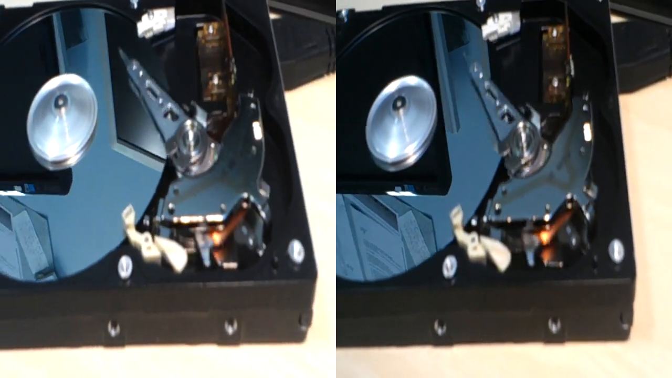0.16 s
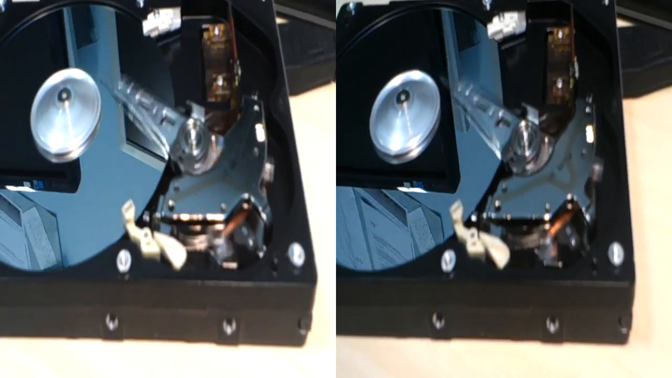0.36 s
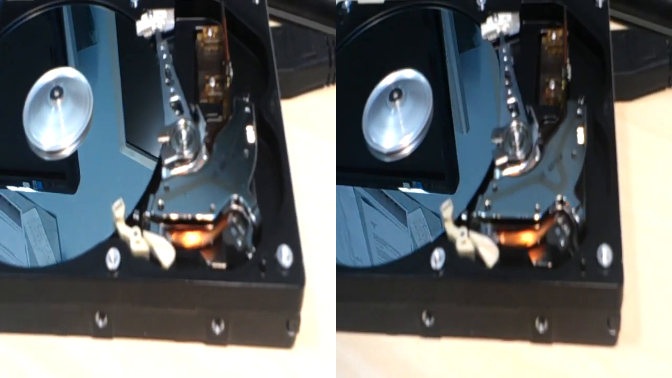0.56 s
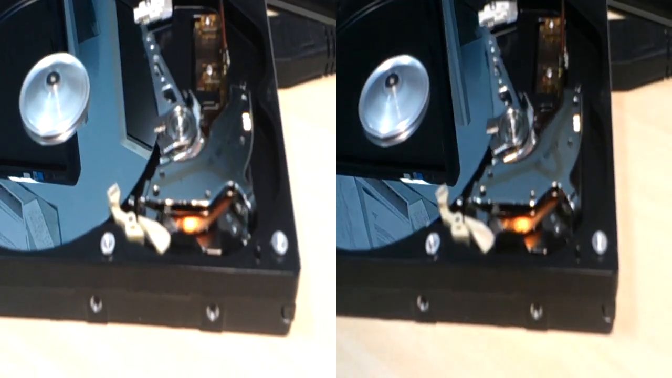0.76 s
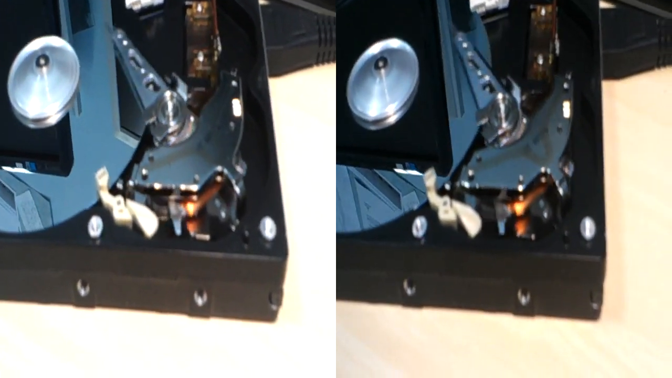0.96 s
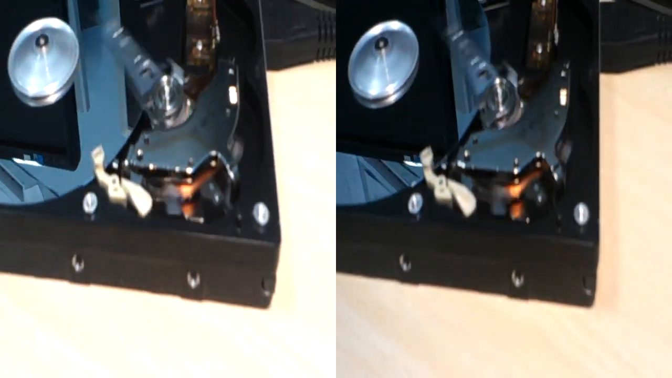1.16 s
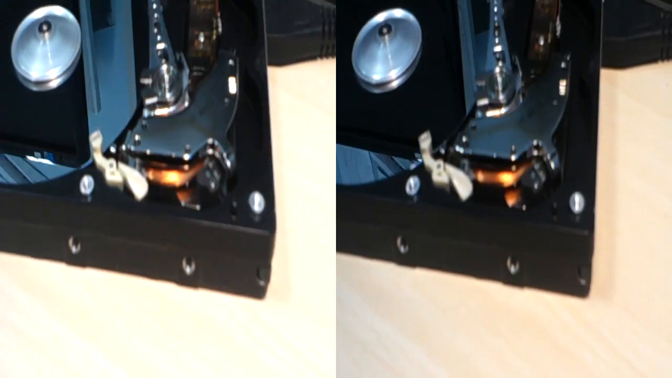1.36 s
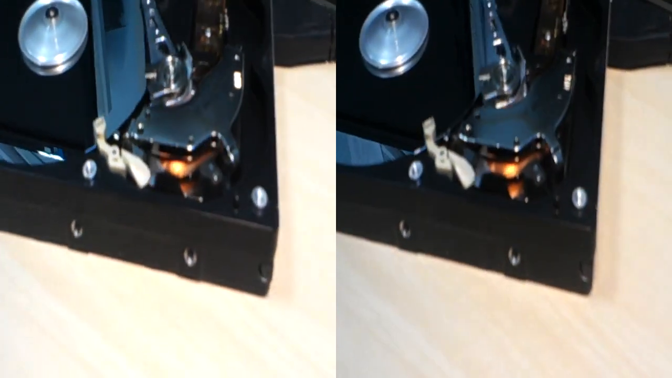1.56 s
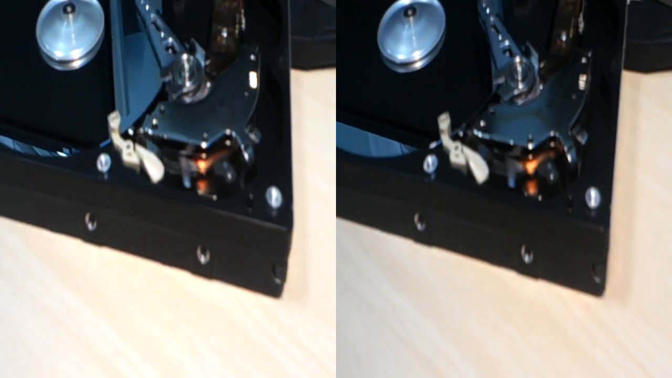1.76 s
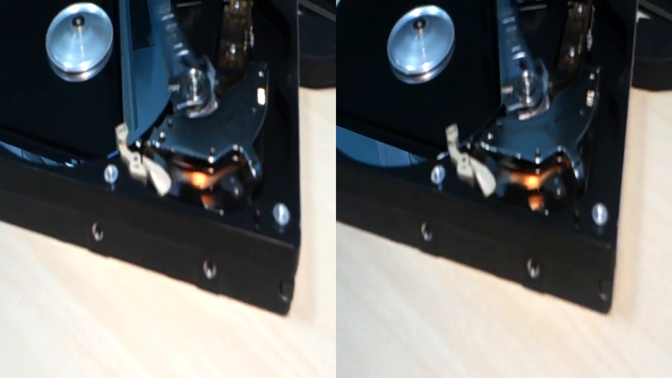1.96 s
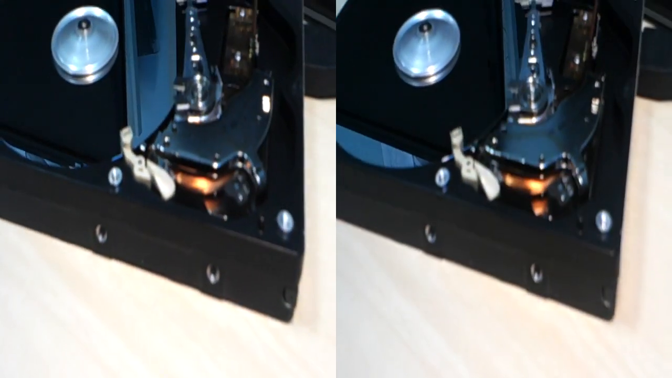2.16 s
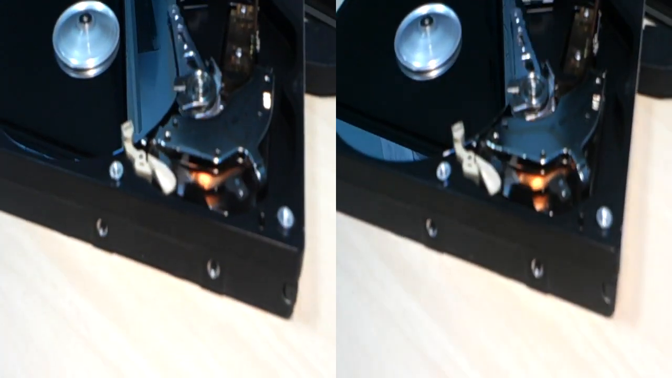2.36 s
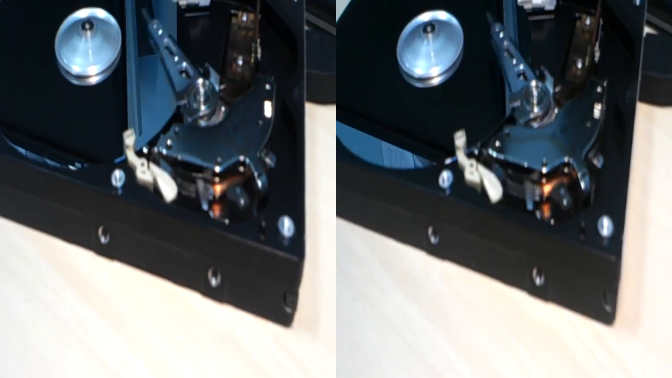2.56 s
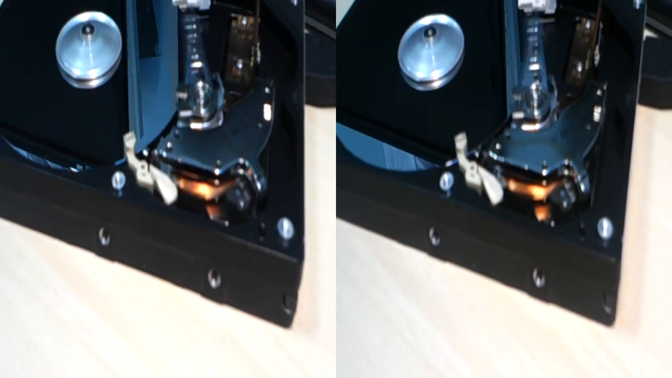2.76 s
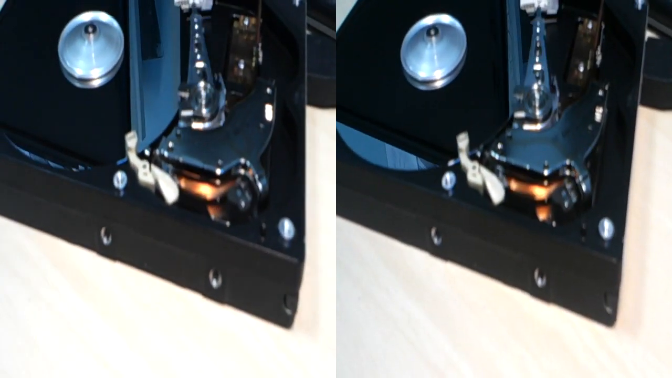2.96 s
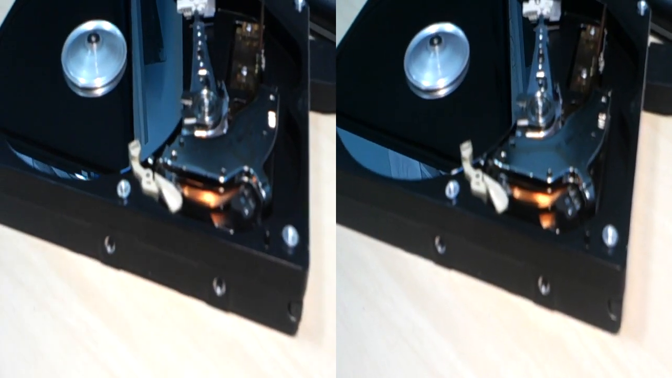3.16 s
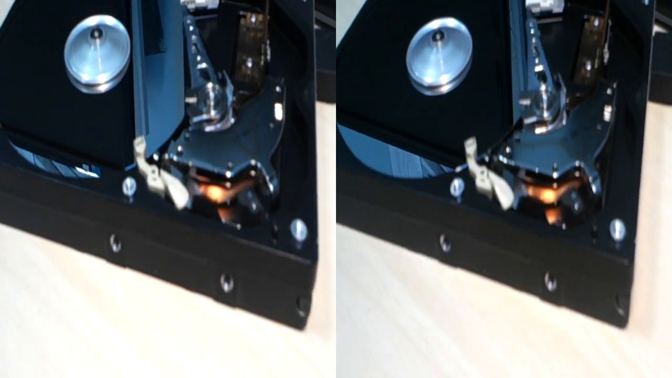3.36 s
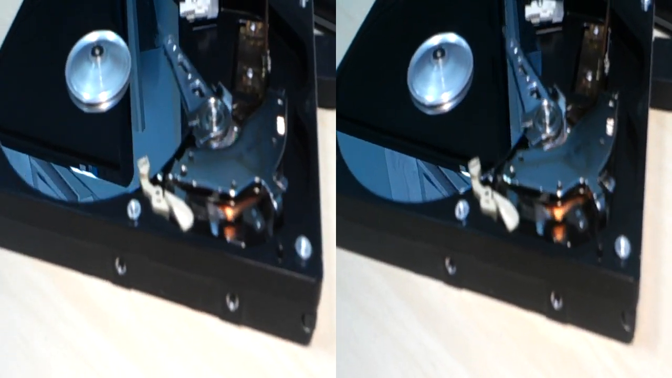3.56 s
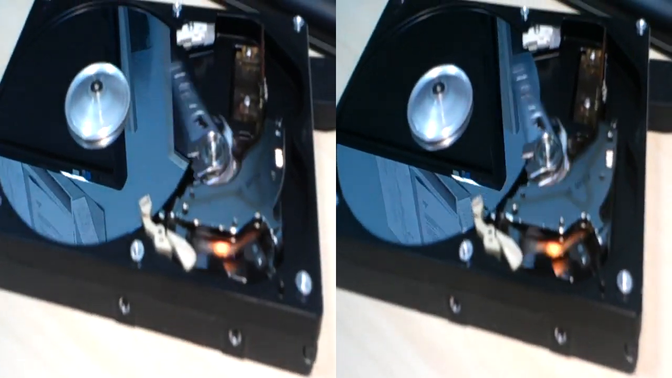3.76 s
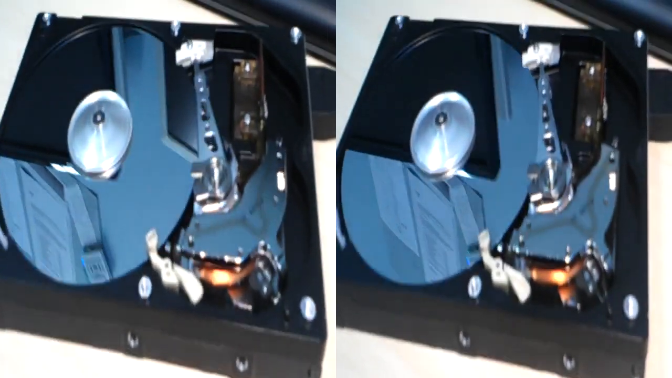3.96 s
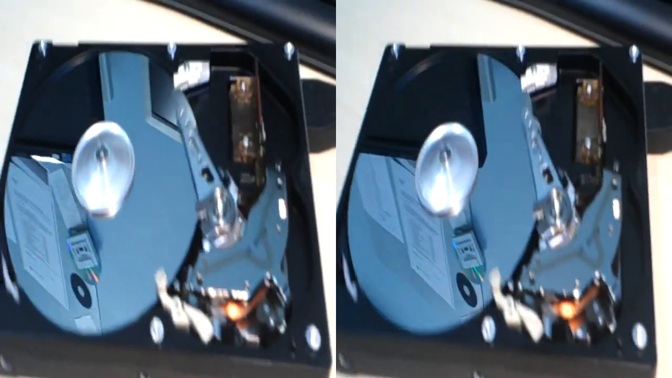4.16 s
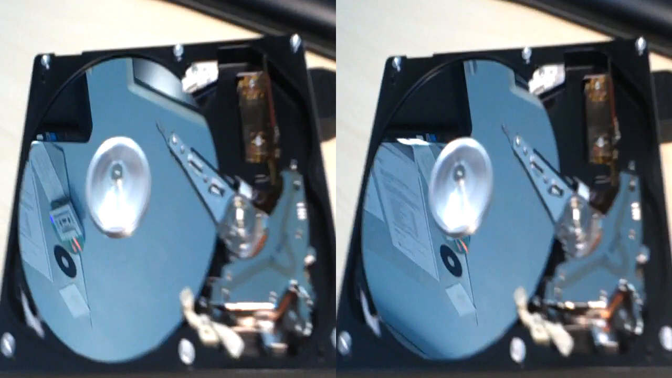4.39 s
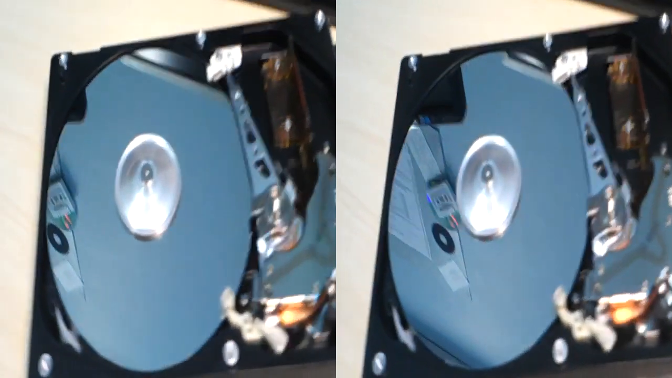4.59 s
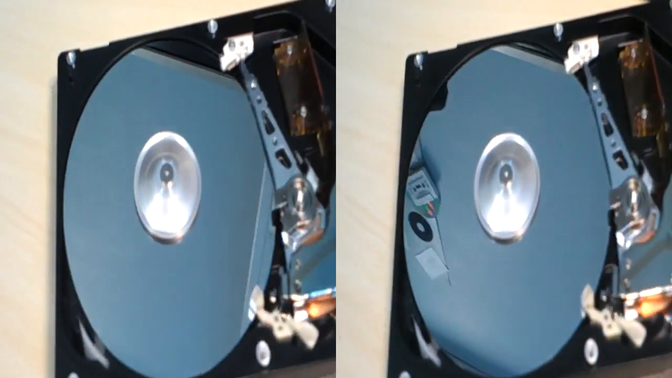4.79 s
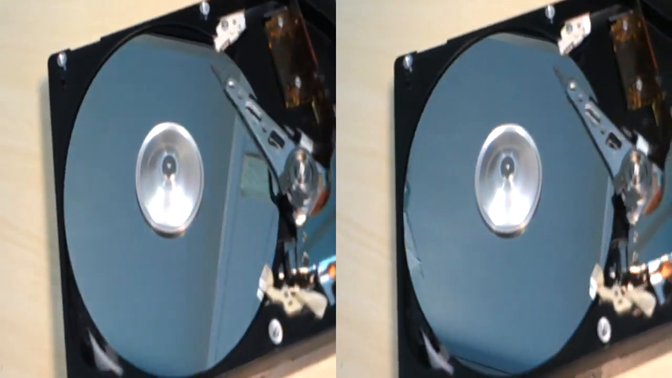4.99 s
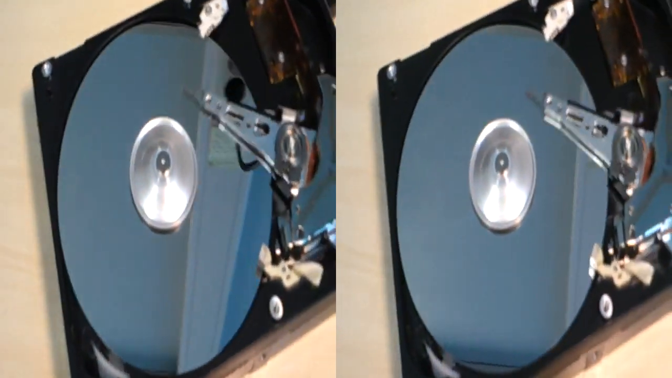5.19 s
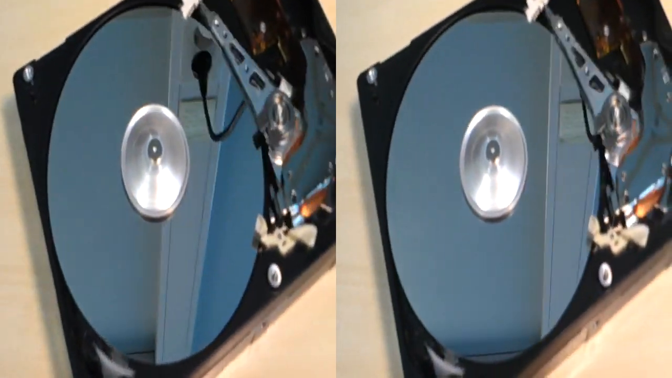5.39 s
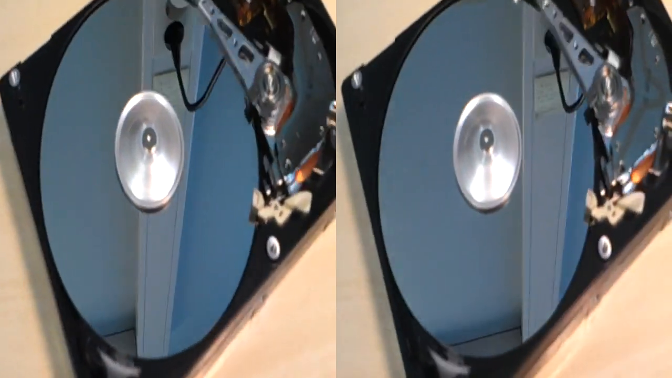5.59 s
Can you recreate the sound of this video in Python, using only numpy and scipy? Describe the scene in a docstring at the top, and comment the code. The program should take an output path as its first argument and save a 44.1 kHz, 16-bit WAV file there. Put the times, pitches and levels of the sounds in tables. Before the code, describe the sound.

Close up, spinning disk platters hiss under a rhythmic cycle of small ticks, sharp knocks and harsh metal slams from a failing drive.

```python
"""On a desk, an open hard disk drive spins close to a moving hand-held microphone.
Platters hiss (shaped noise), the spindle motor whines (sines locked to the shaft), low tones and a whirr drone.
Over and over the servo whistles and the head arm twitches, knocks on its stop, then swings across and slams
into it, so loudly that the microphone overloads: bursts of force ring the damped modes of arm and chassis."""
import sys
import numpy as np
from scipy import signal
from scipy.fft import rfft, irfft, next_fast_len
from scipy.io import wavfile
from scipy.ndimage import uniform_filter1d

SR = 44100
rng = np.random.default_rng(int(sys.argv[2]) if len(sys.argv) > 2 else 0)


def generate_wav(sig):
    """Save sig (samples, or channels by samples) to the path in sys.argv[1] as 16-bit PCM at SR."""
    pcm = np.round(np.clip(np.atleast_2d(sig).T, -1, 1) * 32767).astype(np.int16)
    wavfile.write(sys.argv[1], SR, pcm)


N = 248283

# arm jerks, each inside a servo whistle:
# t/s, level/dB, clatter/dB (other modes against the two main ones, before clatter_share), whistle/dB
TWITCHES = [(0.0243, -29.5, 6, -44), (.792, -25.5, -3, -39), (1.572, -25.5, -10, -47),
            (2.342, -24.5, -8, -46), (3.112, -24, -8, -46), (4.1505, -25, -11, -47), (4.9195, -28, 13, -48)]

# forces on the metal; order picks the column of mode levels
SWING = dict(order=0, grit=1.5, kick=1.7, held_s=0.27, scrape_db=-11, scrape_s=0.021)
STOP = dict(order=1, grit=0.92, kick=3.1, held_s=0.016, scrape_db=-14, scrape_s=0.0042)
JERK = dict(order=2, grit=0.88, kick=0.54, held_s=0.041, scrape_db=-9, scrape_s=0.0047)


def amp(db):
    """Decibels to gain."""
    return 10 ** (np.asarray(db) / 20)


def unit(x):
    """Scales to rms 1."""
    return x / np.sqrt(np.mean(abs(x) ** 2) + 1e-20)


def read(points, hz):
    """Reads a spectrum on a log-frequency axis."""
    f_hz, value = np.transpose(points)
    return np.interp(np.log(hz + 1), np.log(f_hz), value)


def follow(rows):
    """Interpolates each column of a curve table, sample by sample."""
    knot_s, *columns = np.transpose(rows)
    time_s = np.arange(N) / SR
    return [np.interp(time_s, knot_s, column) for column in columns]


def add(mix, start_s, sound):
    """Mixes a sound in at start_s, in place."""
    part = mix[max(round(start_s * SR), 0):][:len(sound)]
    part += sound[:len(part)]


def colour(x, points):
    """Filters by a spectrum of (f/Hz, gain/dB), zero phase."""
    size = next_fast_len(len(x) + 512)
    gain = amp(read(points, np.fft.rfftfreq(size, 1 / SR)))
    return irfft(rfft(x, size) * gain, size)[:len(x)]


def drift(per_s):
    """Slow random curve of rms 1, per_s random knots a second joined by lines."""
    knots = rng.standard_normal(512)
    return unit(np.interp(np.arange(N) / SR * per_s, np.arange(len(knots)), knots))


def tone(hz, waver_hz, per_s):
    """Slightly unsteady sine of rms 1."""
    turns = np.cumsum(hz + waver_hz * drift(per_s)) / SR
    return unit(np.sin(2 * np.pi * turns))


def ring(hz, width_hz):
    """Noise-driven resonance: a fuzzy tone of rms 1."""
    size = next_fast_len(N)
    f_hz = np.fft.rfftfreq(size, 1 / SR)
    response = 1 / (1 + (2 * (f_hz - hz) / width_hz) ** 2)
    return unit(irfft(rfft(rng.standard_normal(size)) * response, size)[:N])


def head_arm():
    """Twitches, light knocks and full slams all ring the same metal."""
    # light knocks on the stop: t/s, level/dB, chatter length/s, clatter/dB, rebound/dB
    knocks = [(.1, -17.5, 0.0014, 5.5, -34), (0.8763, -15, 0.0037, 5.5, -34),
              (1.6506, -16.5, 0.0022, 4.5, -33.5), (2.4196, -15, 0.0043, 0, -30.5),
              (3.1927, -16, .0032, -1, -31.5), (4.226, -17.5, 0.0033, 7.5, -34),
              (5.0, -20.5, .0015, 14, -41)]
    # full swings into the stop:
    # t/s, swing/dB, swing bass/dB, travel/s, slam/dB, chatter length/s, clatter/dB
    slams = [(0.3428, -14, 4, 0.0086, -9.5, .0044, 5), (1.1219, -11, 6, 0.011, -8, 0.0073, 1.5),
             (1.8946, -13.5, -3, .008, -7, 0.0071, -1), (2.665, -13, -6, .0085, -8, 0.0073, -2.5),
             (3.4373, -13.5, -5, .0089, -3.5, .0077, -8.5), (3.7031, -14.5, -3.5, .0087, -4, .0067, -4.5),
             (4.4715, -15.5, 6, .0073, -12.5, .0065, 7.5), (5.244, -13.5, 12, .011, -17.5, 0.0066, 4)]
    push_lead_s, push_db = 0.0153, -13.5  # soft coil push before each knock, dB relative to the knock
    rebound_s = 0.103
    # one hard slam bounces back on to the stop, then rebounds
    bounce_s, bounce_db, bounce_rebound_db = 3.4592, -12.5, -29.5

    out = np.zeros(N)
    for start_s, db, clatter_db, _ in TWITCHES:
        jerk = blow(0.0033, bass_db=-1, middle_db=-0.6, treble_db=0.5, clatter_db=clatter_db, **JERK)
        add(out, start_s, amp(db) * jerk)

    for start_s, db, length_s, clatter_db, rebound_db in knocks:
        push = blow(0.0095, bass_db=9, middle_db=-4, treble_db=4.5, **JERK)
        add(out, start_s - push_lead_s, amp(db + push_db) * push)
        knock = blow(length_s, bass_db=1, middle_db=-2, treble_db=1, clatter_db=clatter_db, **STOP)
        add(out, start_s, amp(db) * knock)
        add(out, start_s + rebound_s, amp(rebound_db) * rebound(clatter_db))

    for start_s, swing_db, bass_db, travel_s, slam_db, length_s, clatter_db in slams:
        swing = blow(0.01, bass_db=bass_db, middle_db=0, treble_db=1.5, **SWING)
        add(out, start_s, amp(swing_db) * swing)
        slam = blow(length_s, bass_db=-9, middle_db=1, treble_db=-7, clatter_db=clatter_db, **STOP)
        add(out, start_s + travel_s, amp(slam_db) * slam)

    bounce = blow(0.0016, bass_db=3, middle_db=-4, treble_db=0.5, **STOP)
    add(out, bounce_s, amp(bounce_db) * bounce)
    add(out, bounce_s + rebound_s, amp(bounce_rebound_db) * rebound(0))
    return out


def blow(length_s, bass_db, middle_db, treble_db, order, grit, kick, held_s, scrape_db, scrape_s,
         clatter_db=0):
    """Modes swell while an uneven force lasts, then ring out; rms 1 over the first 20 ms."""
    # ringing of arm and chassis, levels relative and before the balance below:
    # f/Hz, t60/s, full swing/dB, stop hit/dB, short twitch/dB
    modes = [(764, 0.065, -44, -24.5, -43), (966, 0.16, -56, -18, -40), (1111, 0.12, -22, -30.5, -37),
             (1414, 0.091, -19.5, -30, -22), (1624, 0.062, -9.5, -16.5, -33),
             (1820, 0.044, -25, -18.5, -28), (2335.5, 0.087, -10.5, -11, -5.5),
             (2410, 0.025, -18, -19, -18), (2730, 0.061, -21, -39, -26), (2772, 0.027, 6, -18.5, -7),
             (2747, 0.47, -5.5, -20.5, -10), (2965, 0.059, -14, -27, -4), (3120, 0.029, -34, -46, -7),
             (3384, 0.021, -4, -8, -23), (3461, 0.02, -4.5, -3, -26), (3743, 0.04, -6, 4, -18),
             (3905, 0.049, -3.5, -14, -3.5), (4065, 0.014, -12, -12, 2.5), (4538, 0.013, -3, -8.5, -14),
             (4630, 0.018, -8, -9.5, -10), (4795, .03, -7.5, -18.5, -14), (5580, 0.016, -15.5, -23.5, -15),
             (5800, 0.046, -15, -21, -27), (6290, 0.04, -16, -19.5, -28), (6294, 0.029, -6.5, -18, -8),
             (6850, 0.047, -10, -25, -5), (7080, 0.012, -15, -20, -29), (8700, 0.015, -15, -15.5, -11)]
    # dry scrape of a contact: f/Hz, relative density/dB per Hz
    scrape_spectrum = [(100, -49), (500, -10), (1200, -11), (2500, 10), (4200, 1), (5200, -1), (7000, -2),
                       (9000, -4), (11500, -7.5), (14000, -20)]
    # factors on clatter_db: bass, middle, treble modes [ratio]
    clatter_share = (0.93, 1.08, .8)

    t = np.arange(SR // 4) / SR
    bass, middle, treble = np.array([bass_db, middle_db, treble_db]) + clatter_db * np.array(clatter_share)
    balance = [(2400, bass), (2750, 0), (3400, middle), (3500, middle), (3750, 0), (4550, treble)]
    # a jerk, then a short push
    force = (1 + kick * np.exp(-t / 0.0014)) / (1 + (t / length_s) ** 8)

    ringing = np.zeros(len(t))
    for hz, t60_s, *mode_db in modes:
        # parts chatter against each other about once a millisecond
        real, imag = uniform_filter1d(rng.standard_normal((2, len(t))), size=48, axis=1)
        uneven_force = force * (1 + grit * unit(real + 1j * imag))
        decay = amp(-60 / (t60_s * SR))  # per sample
        swell = signal.lfilter([1], [1, -decay], uneven_force)
        detune = 1 + 0.002 * rng.standard_normal()
        mode = (swell * np.exp(2j * np.pi * (hz * detune * t + rng.random()))).real
        ringing += amp(mode_db[order] + read(balance, hz)) * unit(mode)
    # the arm comes to rest and damps the ringing
    ringing *= 0.5 + 0.5 / (1 + (t / held_s) ** 8)

    scrape = colour(rng.standard_normal(len(t)), scrape_spectrum)
    scrape *= np.exp(-np.maximum(t - length_s, 0) / scrape_s)
    sound = unit(ringing) + amp(scrape_db + treble / 2) * unit(scrape)
    return sound / np.std(sound[:SR // 50])


def rebound(clatter_db):
    """The arm falls back on its stop: a thin tick, scaled down to faint by the caller."""
    return blow(0.0033, bass_db=-7, middle_db=-5.5, treble_db=1.5, clatter_db=clatter_db, **STOP)


def servo(hz=10740, width_hz=240, lead_s=0.053, length_s=0.083):
    """Thin whistle while the servo holds the arm, round each twitch: gated narrow-band noise."""
    gate = np.zeros(N)
    for twitch_s, _, _, whistle_db in TWITCHES:
        start_s = max(twitch_s - lead_s, 0)
        end_s = twitch_s - lead_s + length_s
        window = signal.windows.tukey(int((end_s - start_s) * SR), 0.3)
        add(gate, start_s, amp(whistle_db) * window)
    return gate * ring(hz, width_hz)


def platter_hiss(level_db=-32.5, patchy_db=1.24, edge_hz=12300, aspect_depth=1.1):
    """Turbulent air, coloured by resonances and microphone place; aspect leaves 2.5 kHz alone."""
    # air dragged round by the platters: f/Hz, relative density/dB per Hz
    air = [(20, 0), (45, 3.5), (80, -1.5), (250, -4), (700, -0.5), (1000, -3), (1600, 0), (2600, -2.5),
           (3600, 3.5), (5200, -1), (6800, 2), (8500, 0.5), (9100, -6), (11200, -8)]
    # narrow and broad resonances that colour the hiss:
    # f/Hz, width/Hz (before narrowing), power over the air/dB
    resonances = [(316, 25, 5.5), (680, 27, 4.5), (2065, 310, 14), (2997, 256, 9.5), (4570, 260, 3)]
    # hiss as the microphone moves; only the departure from each mean counts, times aspect_depth:
    # t/s, near 900 Hz/dB, near 6 kHz/dB, near 7 kHz/dB, near 8 kHz/dB
    aspect = [(0.0, -47.5, -45, -44, -45), (0.56, -47, -44.5, -43.5, -44.5), (0.99, -47, -43, -48, -45.5),
              (1.6, -49, -46, -49.5, -43.5), (1.9, -47, -46.5, -49, -46), (2.18, -49, -47, -48.5, -46),
              (2.68, -49, -47.5, -45, -48), (3.56, -49, -46.5, -45, -48.5),
              (4.01, -48.5, -46.5, -49, -46.5), (4.37, -50, -47, -50, -46), (5.0, -50.5, -44.5, -42, -44.5),
              (5.63, -52.5, -45, -47.5, -47)]
    narrowing = 0.64

    hz, t, z = signal.stft(rng.standard_normal(N), SR, nperseg=2048, noverlap=1536)
    peaks = sum(amp(db) ** 2 / (1 + ((hz - centre_hz) / (narrowing * width_hz)) ** 2) ** 2
                for centre_hz, width_hz, db in resonances)
    shape = amp(read(air, hz)) * np.sqrt((1 + peaks) / (1 + (hz / edge_hz) ** 50))

    knot_s, *bands = np.transpose(aspect)
    low, *treble = [np.interp(t, knot_s, band - np.mean(band)) for band in bands]
    centres_hz = [900, 2500, 6000, 7050, 8000]
    courses_db = [low, np.zeros(len(t)), *treble]
    aspect_db = sum(np.outer(np.interp(hz, centres_hz, share), course_db)
                    for share, course_db in zip(np.eye(len(centres_hz)), courses_db))

    # random patches over frequency and time
    patches = uniform_filter1d(rng.standard_normal(z.shape), size=20, axis=0)
    patches = unit(uniform_filter1d(patches, size=5, axis=1))
    z = z * shape[:, None] * amp(aspect_depth * aspect_db + patchy_db * patches)
    hiss = signal.istft(z, SR, nperseg=2048, noverlap=1536)[1][:N]
    return amp(level_db) * unit(hiss)


def spindle(shaft_hz=120.13, waver_db=3.0, wobble_hz=0.0493):
    """Motor orders locked to the shaft, swelling and fading with the microphone's place; narrow rings."""
    # motor whine: multiple of shaft speed [ratio], level/dB before waver
    whine_orders = [(36, -59), (37, -62), (56, -62), (58, -60), (60, -54), (66, -55), (72, -54)]
    # narrow ringing of the spinning assembly: f/Hz, width/Hz, level/dB
    rings = [(186, 35, -63.5), (3830, 3.5, -50.5), (11100, 25, -59)]

    turns = np.cumsum(shaft_hz + wobble_hz * drift(20)) / SR
    out = np.zeros(N)
    for multiple, db in whine_orders:
        whine = unit(np.sin(2 * np.pi * (multiple * turns + rng.random())))
        out += amp(db + waver_db * drift(3.51)) * whine
    for hz, width_hz, db in rings:
        out += amp(db) * ring(hz, width_hz)
    return out


def drone(whirr_hz=1433, swell_db=1.5, flutter_db=2.5):
    """Two close low tones beat under a thin, fluttering whirr: unsteady sines."""
    # lower tone: t/s, f/Hz, level/dB before swell
    low_drone = [(0, 296, -55.5), (.35, 295, -46.5), (.9, 295.4, -41.5), (1.35, 293, -58.5),
                 (1.95, 294.6, -56), (2.22, 293.3, -45.5), (2.42, 290, -51.5), (2.73, 290, -44),
                 (2.9, 291.6, -58), (5.63, 290, -79)]
    # upper tone, slowly sinking: t/s, f/Hz, level/dB before swell
    high_drone = [(0, 321, -61), (1.25, 319, -51), (1.55, 319, -55.5), (2.8, 314, -59), (3.55, 311, -51),
                  (4.1, 303.7, -49.5), (4.6, 302, -63.5), (5.15, 295.6, -52), (5.63, 292, -61)]
    # whirr that swells early and dies away: t/s, level/dB before flutter
    whirr_course = [(0, -48), (.12, -44), (.35, -53.5), (.85, -41.5), (1.1, -48), (1.6, -51), (2.2, -70),
                    (5.63, -70)]

    out = np.zeros(N)
    for course in (low_drone, high_drone):
        hz, db = follow(course)
        out += amp(db + swell_db * drift(7)) * tone(hz, waver_hz=1.28, per_s=25)
    whirr_db, = follow(whirr_course)
    whirr = tone(whirr_hz, waver_hz=11.8, per_s=80)
    return out + amp(whirr_db + flutter_db * drift(29.9)) * whirr


def rustle(start_s=5.24, length_s=0.22, hz=410, width_hz=190, db=-48.0):
    """Soft, low rub, as of a hand shifting its grip: one gated burst of narrow-band noise."""
    gate = np.zeros(N)
    add(gate, start_s, amp(db) * signal.windows.tukey(int(length_s * SR), 0.6))
    return gate * ring(hz, width_hz)


def desk_hum(hz=39):
    """Faint, deep, wavering hum in the desk: an unsteady sine."""
    # hum: t/s, level/dB
    hum_course = [(0, -55), (1.2, -56.5), (3.2, -65), (3.9, -56.5), (5.63, -59)]
    level_db, = follow(hum_course)
    return amp(level_db) * tone(hz, waver_hz=1.16, per_s=8)


def room(x, t60_s=0.46, wet_db=-16, build_s=0.027):
    """Room with distant walls: sparse reflections that build up and die away."""
    t = np.arange(SR // 2) / SR
    # the drive radiates a different balance sideways, towards the walls
    sideways = colour(x, [(1000, 0.5), (2500, 2.5), (3100, 3.5), (3550, 2.5), (3760, -3.0),
                          (3950, -0.5), (4500, 0.0), (7000, 3)])
    wet = np.zeros(N)
    # the microphone wanders, so the mix of three reflection patterns keeps turning
    for place in np.arange(3) / 3:
        taps = rng.standard_normal(len(t)) * (rng.random(len(t)) < 3000 / SR)  # about 3000 a second
        tail = taps * amp(-60 * t / t60_s) * (1 - np.exp(-(t / build_s) ** 2))
        share = np.sqrt(2 / 3) * np.cos(np.pi * (np.arange(N) / SR / 2 + place))
        wet += signal.fftconvolve(share * sideways, tail / np.linalg.norm(tail))[:N]
    return x + amp(wet_db) * wet


def scene():
    """The drive on the desk, in mono; only the head arm excites the room."""
    mix = room(head_arm()) + servo() + platter_hiss() + spindle() + drone() + rustle() + desk_hum()
    return mix[None]


def record(dry, threshold_db=-18, squeeze_db_per_db=0.12, recovery_db_per_s=8, ceiling=0.73, edge_hz=15830):
    """Mild gain control, overload on the slams, dull top octave and band limit."""
    x = colour(dry[0], [(12800, 0), (14200, -18)])

    # fast attack, steady recovery
    power_db = 10 * np.log10(abs(uniform_filter1d(x ** 2, size=256)) + 1e-12)
    fall_db = np.arange(N) / SR * recovery_db_per_s
    held_db = np.maximum.accumulate(power_db + fall_db) - fall_db
    x = x * amp(-squeeze_db_per_db * np.maximum(held_db - threshold_db, 0))

    x = x / (1 + abs(x / ceiling) ** 12) ** (1 / 12)  # overload
    x = colour(x, [(9000, -0.5), (11400, -3.5), (13000, -12), (15500, -12)])
    band_limit = signal.firwin(511, edge_hz, window=("kaiser", 9), fs=SR)
    return signal.oaconvolve(x, band_limit, "same")[None]


dry = scene()
out = record(dry)
generate_wav(out)
```